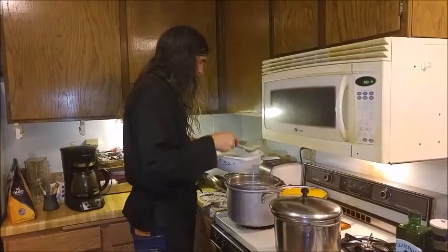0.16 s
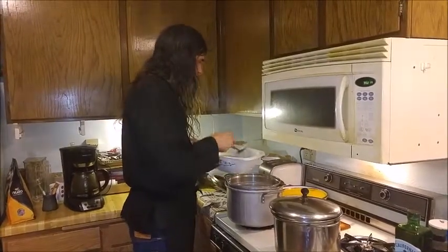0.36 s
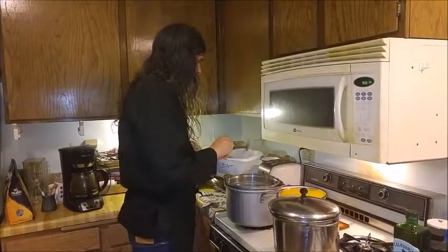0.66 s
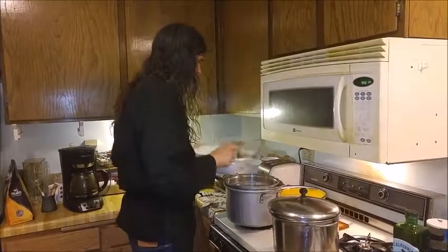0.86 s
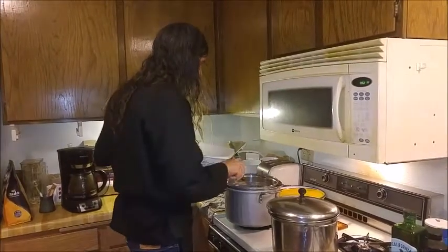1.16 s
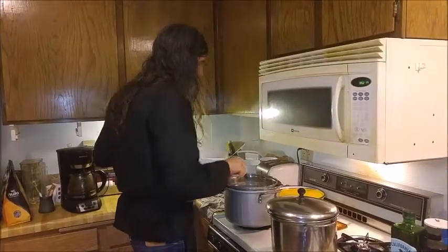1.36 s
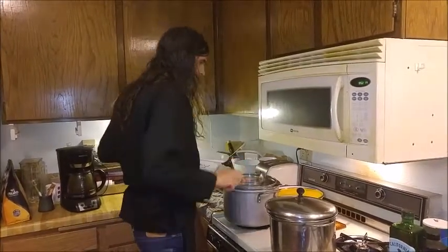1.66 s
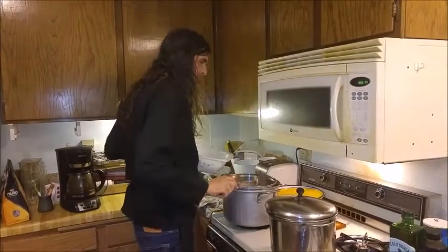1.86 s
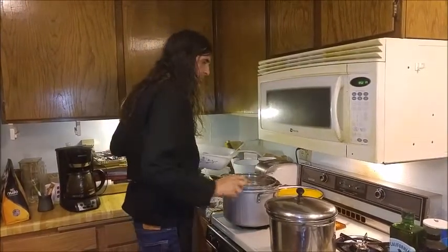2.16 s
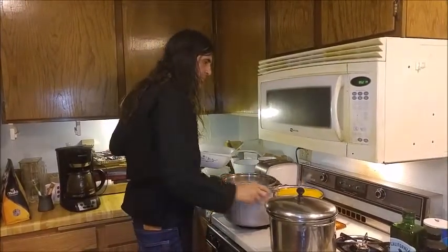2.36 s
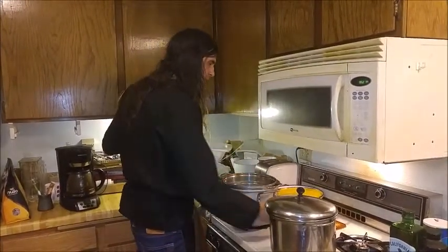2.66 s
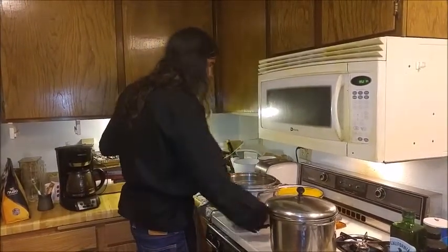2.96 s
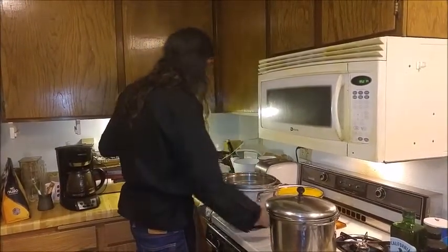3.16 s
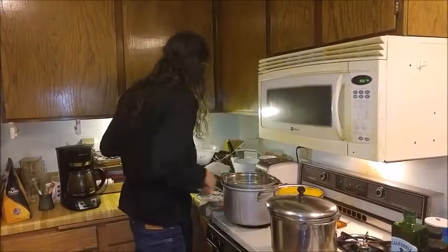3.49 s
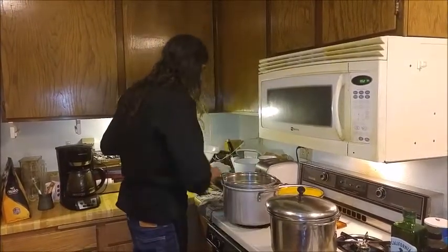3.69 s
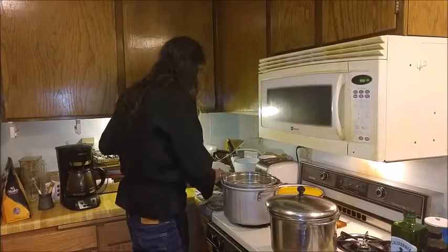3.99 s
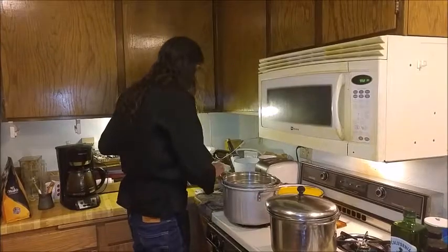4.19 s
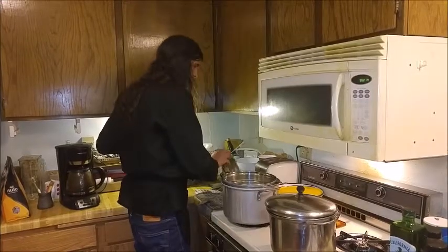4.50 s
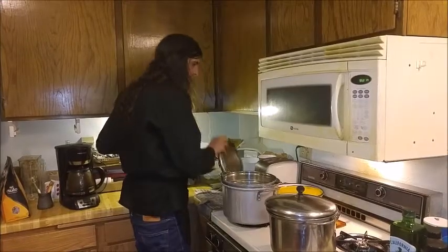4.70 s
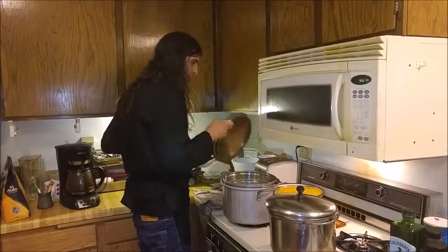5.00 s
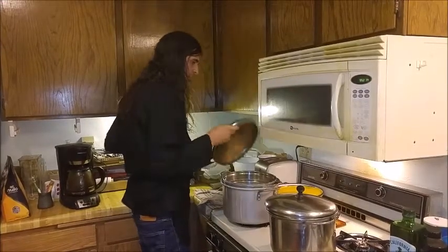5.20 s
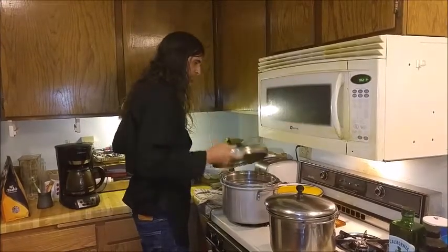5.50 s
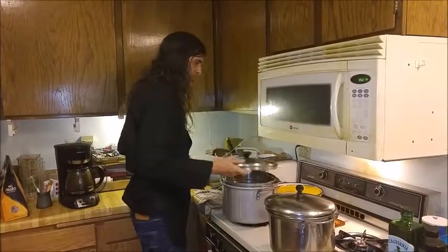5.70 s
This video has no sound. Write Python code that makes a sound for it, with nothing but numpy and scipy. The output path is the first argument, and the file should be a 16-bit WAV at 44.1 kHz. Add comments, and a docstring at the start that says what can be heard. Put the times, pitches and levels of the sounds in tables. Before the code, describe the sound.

In a small home kitchen, a few steps from the microphones, faint touches precede two loud, bright spoon raps on a pot rim. The spoon clatters onto the stove top and a pan knocks. A sleeve brushes softly, then a steel lid is nudged, thuds, is lifted, bumps with a rattle and lands on the pot. Low room hush, a faint high whine and tiny dry ticks run beneath.

```python
"""A cook at a stove in a small kitchen, a few steps from the microphones, over a quiet hush and a faint whine.
A light tap and touches come first; a spoon raps twice on a pot rim as the pot rocks, then clatters
down on the stove top. A pan knocks, cookware shifts, a sleeve brushes the counter amid small touches; a steel
lid is nudged, thuds, is lifted, grazes, bumps with a rattle and is set down on the pot. Dry ticks dot the scene.
Knocks are noise cracks plus ringing modes, thrown back by the cabinets; friction and air are shaped noise."""
import sys
import numpy as np
from scipy import signal
from scipy.fft import rfft, irfft
from scipy.io import wavfile
from scipy.ndimage import uniform_filter1d

SR = 44100
rng = np.random.default_rng(int(sys.argv[2]) if len(sys.argv) > 2 else 0)


def digitize_waveform(pressure):
    """Quantize a signal to 16-bit integers and store it at the path in sys.argv[1].

    Rows of a 2-D input are taken as channels; values are limited to [-1, 1].
    """
    field = np.atleast_2d(pressure).T
    bounded = np.clip(field, -1, 1)
    quanta = np.round(bounded * 32767).astype(np.int16)
    wavfile.write(sys.argv[1], SR, quanta)


N = 257828  # scene length, samples
SIZE = 32768  # length of one knock with its room tail, samples


def amp(db):
    """Decibels to gain."""
    return 10 ** (np.asarray(db) / 20)


def evened(x):
    """Scales to rms 1."""
    return x / np.sqrt(np.mean(x ** 2) + 1e-20)


def read(points, hz):
    """Reads a table on a log-frequency axis."""
    f, value = np.transpose(points)
    return np.interp(np.log(hz + 1), np.log(f + 1), value)


def add(mix, start_s, sound):
    """Mixes a stereo sound in at its start time, cut where the scene ends."""
    part = mix[:, round(start_s * SR):][:, :sound.shape[1]]
    part += sound[:, :part.shape[1]]


def two_ports(z, hz):
    """Two unrelated spectra become a diffuse field at two spaced microphones: bass alike, treble apart."""
    same = .95 / (1 + (hz / 830) ** 3)
    mid = z[0] * np.sqrt(1 + same)
    side = z[1] * np.sqrt(1 - same)
    return np.array([mid + side, mid - side])


def noise(colour):
    """Diffuse stereo noise of this colour, rms 1."""
    hz = np.fft.rfftfreq(N, 1 / SR)
    diffuse = two_ports(rfft(rng.standard_normal((2, N))), hz)
    return evened(irfft(diffuse * amp(read(colour, hz)), N))


def wander(rate_hz):
    """Slow chance up to this rate, rms 1."""
    slow = np.fft.rfftfreq(N, 1 / SR) < rate_hz
    return evened(irfft(rfft(rng.standard_normal(N)) * slow, N))


def causal(db):
    """Spectrum of the filter with this gain that rings only after the blow."""
    cepstrum = irfft(db * np.log(10) / 20)
    one_sided = np.r_[1, np.full(SIZE // 2 - 1, 2), 1, np.zeros(SIZE // 2 - 1)]
    return np.exp(rfft(cepstrum * one_sided))


# standing waves and gaps between cabinets, counter and floor: centre_hz, width_hz, gain_db
STANDING_WAVES = [(50.4, 6, 4.5), (183, 5, 9), (194, 10, -6.5), (264, 27, 4.5), (310, 8.8, -4),
                  (512.4, 37, -10)]


def standing_db(hz):
    """Peaks and gaps that the kitchen gives to every knock's low end."""
    return sum(db * np.exp(-.5 * ((hz - f) / width) ** 2) for f, width, db in STANDING_WAVES)


# how long the kitchen rings in each band: band_hz, t60_s
KITCHEN_DECAY = [(55, 0.85), (160, 0.48), (420, 0.34), (1500, 0.305), (7000, 0.315), (14000, 0.22)]


def kitchen(count):
    """Spectra of paths to the microphones: weak direct sound, swelling cabinet echoes, a tail dying by band."""
    early, early_s = .76, .026  # extra strength of the early echoes (share), and how long it lasts
    build_s, direct = .0023, 1.3  # time for echoes to build up; direct sound (gain)
    t, hz = np.arange(SIZE) / SR, np.fft.rfftfreq(SIZE, 1 / SR)
    centres, t60s = np.transpose(KITCHEN_DECAY)
    bands = [read(np.c_[centres, one], hz) for one in np.eye(len(centres))]
    early_boost = 1 + early * np.exp(-(t / early_s) ** 2)
    decays = np.exp(-np.log(1000) * t / t60s[:, None]) * early_boost
    standing, paths = standing_db(hz), []
    for _ in range(count):
        taps = rng.standard_normal((2, SIZE)) * (1 - np.exp(-t / build_s))
        taps[0, 8] += direct
        z = rfft(taps)
        z = rfft(sum(irfft(z * band) * decay for band, decay in zip(bands, decays)))
        # echoes carry equal power in every band; colour comes from the object and the standing waves
        power = uniform_filter1d(abs(z) ** 2, size=45)
        level = causal(standing - 10 * np.log10(power + 1e-12))
        paths.append(two_ports(z * level, hz))
    return paths


def overtones_db(hz):
    """Sheet metal has countless close overtones: a random comb of narrow peaks in the treble."""
    depth_db, from_hz = 5.4, 1100
    comb = uniform_filter1d(rng.standard_normal(len(hz)), size=40)
    comb = uniform_filter1d(comb, size=40)
    return depth_db * np.tanh(evened(comb)) * hz ** 2 / (hz ** 2 + from_hz ** 2)


def ringing(modes, swell_s):
    """Each mode swells in, decays and beats against its own echoes."""
    flutter = .2  # waver, rms share of a mode's amplitude
    t = np.arange(SIZE) / SR
    mode_hz, _, t60 = np.transpose(modes)
    waves = np.exp(np.outer(2j * np.pi * mode_hz - np.log(1000) / t60, t))
    waves = waves * (1 - np.exp(-t / swell_s))
    waver = signal.resample(rng.standard_normal((len(modes), 32)), SIZE, axis=1)
    return waves * (1 + flutter * waver)


def blows(rows, colour, modes, ring_db, damp_db_per_s=0, swell_s=.0099):
    """Each contact is a coloured crack scattered by the kitchen, plus object modes; a hand damps both."""
    bass_hz, treble_hz = 480, 3000  # where the bass and treble of the touch take hold
    t, hz, out = np.arange(SIZE) / SR, np.fft.rfftfreq(SIZE, 1 / SR), np.zeros((2, N))
    low_cut_db = 10 * np.log10(1 / (1 + (46 / (hz + 1)) ** 14) + 1e-4)
    fade = np.clip(8 * (1 - t / t[-1]) - .5, 0, 1)
    body = causal(read(colour, hz) + low_cut_db + overtones_db(hz))
    mode_hz, mode_db, _ = np.transpose(modes)
    waves = ringing(modes, swell_s)
    for (start_s, db, bass_db, treble_db), path in zip(rows, kitchen(len(rows))):
        crack = evened(irfft(body * path))
        phases = two_ports(np.exp(2j * np.pi * rng.random((2, len(modes)))), mode_hz)
        ring = evened(((phases * amp(mode_db)) @ waves).real)
        # heavy contacts add bass, hard ones treble
        bass = bass_db / (1 + (hz / bass_hz) ** 4)
        treble = treble_db * (1 - 1 / (1 + (hz / treble_hz) ** 2))
        sound = irfft(rfft(crack + amp(ring_db) * ring) * causal(bass + treble))
        sound = sound * fade * amp(-damp_db_per_s * t)
        attack = np.sqrt(np.mean(sound[:, :SIZE // 32] ** 2))  # level is set by the first moments
        add(out, start_s, sound / attack * amp(db))
    return out


# every knock: kind, start_s, landing_db, edge_db (against landing), edge_to_landing_s, bass_db, treble_db
KNOCK_EVENTS = [("tap", .541, -54, 1, .012, -4, -2), ("rap", 1.807, -14, 1.5, .008, -1, 1),
                ("rock", 1.858, -37, -4, .01, 0, 0), ("rap", 2.077, -18, 4.5, .007, -.5, .5),
                ("rock", 2.1, -38.5, -3, .012, 0, 0), ("clatter", 2.882, -17.3, -2.5, .0055, -2, 1.5),
                ("clatter", 2.9, -23, -1, .008, 2, -3), ("clatter", 2.944, -26, 5, .012, -4, 3.5),
                ("knock", 3.218, -20.8, -1, .014, -5.5, -1), ("nudge", 3.664, -57, -1, .008, 8, -4),
                ("nudge", 4.093, -34.5, -7, .009, 6, .5), ("thud", 4.369, -31, -7, .015, 2, 1.5),
                ("lift", 4.744, -33, -3, .012, 0, 3), ("lift", 4.779, -39.5, -3, .012, 0, 0),
                ("graze", 5.133, -32, -2, .008, -1, 1.5), ("rattle", 5.162, -38, 3, .005, -6, 10),
                ("bump", 5.164, -18.3, -8, .008, .5, -2.5), ("rattle", 5.274, -41.5, -1, .009, -3, -5),
                ("set down", 5.734, -18.3, -10, .0035, -2, 4), ("set down", 5.843, -21, 1.5, .004, 15, 11)]


def contacts(kind):
    """A knock is three contacts: the edge touches, the weight lands, the object rocks back."""
    edge_bass_db, edge_treble_db = -3.5, -1.5  # an edge sounds thinner than the landing
    rock_gaps, rock_db = 2.1, -12  # rocking back: delay after landing (in gaps), level against it
    rows = []  # start_s, level_db, bass_db, treble_db
    for name, start_s, db, edge_db, gap_s, bass_db, treble_db in KNOCK_EVENTS:
        if name == kind:
            landing_s = start_s + gap_s
            rows += [(start_s, db + edge_db, bass_db + edge_bass_db, treble_db + edge_treble_db),
                     (landing_s, db, bass_db, treble_db),
                     (landing_s + rock_gaps * gap_s, db + rock_db, bass_db, treble_db)]
    return rows


# colour of the kitchen hush: pitch_hz, level_db (per Hz)
AIR_COLOUR = [(25, -31.5), (60, -13), (90, -28), (136, -4), (160, -21), (184, 1.5), (215, -16), (280, -10),
              (440, -12), (500, -23), (650, -8.5), (1300, -20.5), (2050, -23.5), (4500, -29.5), (7100, -24),
              (7850, -26), (8400, -15.5), (9400, -26), (15500, -32.5)]


def air():
    """The quiet hush of the kitchen is diffuse noise, wavering slightly and slowly."""
    level_db, waver_db = -64, -1.4
    return amp(level_db + waver_db * wander(6)) * noise(AIR_COLOUR)


def whistle():
    """A faint, fuzzy high whine that comes and goes: a narrow noise band with a loose throb."""
    level_db, centre_hz, width_hz, throb_hz = -75, 6430, 220, 6.8
    hz = np.fft.rfftfreq(N, 1 / SR)
    tone_band = np.exp(-.5 * ((hz - centre_hz) / width_hz) ** 2)
    tone = irfft(rfft(rng.standard_normal((2, N))) * tone_band, N)
    throb_band = np.exp(-.5 * (hz - throb_hz) ** 2)
    throb = evened(irfft(rfft(rng.standard_normal(N)) * throb_band, N))
    return amp(level_db) * evened(tone * (1 + np.tanh(2 * throb)))


# tiny dry ticks by the microphones: start_s, level_db
DRY_TICKS = [(.291, -46.5), (1.571, -45.5), (2.851, -49), (4.131, -44.5), (5.412, -47.5)]


def ticks():
    """Faint, very short ticks of band noise with no room around them."""
    centre_hz, width_hz, peak_s = 8200, 1900, .0006  # peak_s: time from start to peak
    t, out = np.arange(512) / SR, np.zeros((2, N))
    hz = np.fft.rfftfreq(len(t), 1 / SR)
    band = 1 / (1 + ((hz - centre_hz) / width_hz) ** 2) ** 2
    envelope = t / peak_s * np.exp(1 - t / peak_s)
    for start_s, db in DRY_TICKS:
        fizz = irfft(rfft(rng.standard_normal((2, len(t)))) * band)
        add(out, start_s, amp(db) * evened(fizz) * envelope)
    return out


# light touches of the spoon and, later, other small things: start_s, level_db, bass_db, treble_db
LIGHT_TOUCHES = [(1.024, -51.5, 0, 11), (1.235, -60, 8, 5), (3.917, -51.5, -12, 4), (4.001, -54, 8, -12)]
# colour of a light touch: pitch_hz, level_db
TOUCH_TONE = [(59, -50), (100, -20), (321, -3), (500, -9), (700, 0), (1400, -15), (4500, -22), (8550, -9),
              (15800, -25)]
# ringing modes of the spoon, heard in touches and raps: pitch_hz, level_db, t60_s
SPOON_MODES = [(1090, -10, .24), (1365, -13, .27), (1457, 0, .22), (1497, -8, .33), (1548, -3, .22),
               (1610, -2, .2), (1682, -9, .32), (1732, -13, .32), (2290, -12, .24), (4296, -11, .29),
               (4538, -15, .28), (7763, -11, .22), (8086, -9, .2), (8325, -7, .28), (8372, -4, .29),
               (8557, -6, .26), (8770, -4, .25)]


def light_touches():
    """A tap and light touches of the spoon and, later, other small things: weak, damped ringing."""
    rows = LIGHT_TOUCHES + contacts("tap")
    return blows(rows, TOUCH_TONE, SPOON_MODES, ring_db=-22, damp_db_per_s=30)


# colour of spoon on pot rim: pitch_hz, level_db
RAP_TONE = [(45, -31), (280, -19), (950, -20), (1130, -11), (1260, -18), (1460, -2), (1640, -4.5),
            (1830, -13), (2300, -10.5), (3200, -22), (4500, -14), (7500, -12), (8600, -2.5), (9800, -16),
            (15500, -36)]


def spoon_raps():
    """Two hard raps on the pot rim let the spoon ring freely."""
    return blows(contacts("rap"), RAP_TONE, SPOON_MODES, ring_db=-3, swell_s=.005)


# dull colour of the pot rocking: pitch_hz, level_db
ROCKING_TONE = [(50, -19), (100, -25), (330, 1), (1200, -24), (4000, -45)]
# ringing modes of the stove top, also heard in the clatter: pitch_hz, level_db, t60_s
STOVE_MODES = [(291, 0, .3), (409, 0, .25), (630, -.5, .26), (958, -6, .26), (1092, -8, .26),
               (1665, -8, .22), (2589, -12, .21)]


def pot_rocking():
    """The rapped pot rocks with dull knocks and a little stove-top ring."""
    return blows(contacts("rock"), ROCKING_TONE, STOVE_MODES, ring_db=-12)


# colour of the spoon's clatter, also heard in the lid's rattle: pitch_hz, level_db
CLATTER_TONE = [(40, -39), (242, -11.5), (289, -8.5), (410, -9.5), (526, -6), (627, -6), (1060, -16),
                (1170, -21), (1620, -12), (2700, -18), (3300, -25), (8460, -24), (15800, -41)]


def spoon_put_down():
    """The spoon clatters down and the stove top rings undamped."""
    return blows(contacts("clatter"), CLATTER_TONE, STOVE_MODES, ring_db=-5)


# things shifted softly by hand: start_s, length_s, level_db
SOFT_SLIDES = [(3.145, 0.15, -57), (4.2, 0.3, -61), (4.92, 0.22, -60)]
# colour of cookware sliding and of the lid's thud: pitch_hz, level_db
THUD_TONE = [(60, -35), (180, -10.5), (370, -2.5), (480, -9), (680, 1.5), (850, -5.5), (1600, -24),
             (2100, -13), (3200, -34.5), (8000, -27.5), (15500, -40)]


def slides():
    """Soft, unevenly catching friction of cookware: noise in rounded strokes."""
    catch_db, catch_hz = -1, 40
    t = np.arange(N) / SR
    stroke = sum(amp(db) * np.sin(np.pi * np.clip((t - start_s) / length_s, 0, 1))
                 for start_s, length_s, db in SOFT_SLIDES)
    return stroke * evened(amp(catch_db * wander(catch_hz))) * noise(THUD_TONE)


# colour of the pan's knock: pitch_hz, level_db
KNOCK_TONE = [(40, -8), (60, -12.5), (114, -22), (268, -2), (410, -5), (501, -16.5), (612, -3), (1060, -13),
              (1350, -22), (2080, -7), (2600, -18.5), (3270, -25.5), (4700, -28.5), (8460, -25.5),
              (15800, -58)]
# ringing modes of the pan: pitch_hz, level_db, t60_s
PAN_MODES = [(291, 1, .19), (619, -3, .28), (694, -1.5, .26), (1045, -9, .2), (1630, -9, .22),
             (2046, -3, .14), (2030, -15, .42), (2075, -15, .36), (2130, -8, .13)]


def pan_knock():
    """A full, lightly damped knock sets the pan's modes ringing."""
    return blows(contacts("knock"), KNOCK_TONE, PAN_MODES, ring_db=-3.5, damp_db_per_s=10)


# colour of the lid nudged, and of its later graze: pitch_hz, level_db
NUDGE_TONE = [(60, -41), (520, -22), (715, 4.5), (850, -14), (1030, -11), (1350, -36), (2300, -15),
              (3000, -24), (3800, -36), (8500, -37), (15500, -56)]
# ringing modes of the lid, also heard as it is lifted: pitch_hz, level_db, t60_s
LID_MODES = [(690, 0, .1), (765, -7, .12), (1916, -13, .2), (2365, -11, .15), (2439, -11, .22),
             (2676, -14, .28), (2945, -16, .2)]


def lid_nudged():
    """The lid is nudged; strong damping cuts its ring short."""
    return blows(contacts("nudge"), NUDGE_TONE, LID_MODES, ring_db=-5, damp_db_per_s=80, swell_s=.004)


# a sleeve brushes along the counter: time_s, level_db
SLEEVE_STROKE = [(3.76, -78), (3.87, -62), (3.98, -56), (4.05, -60), (4.16, -82)]
# colour of the cloth: pitch_hz, level_db (per Hz)
CLOTH_COLOUR = [(150, -14), (300, 0), (680, 0), (1300, -13), (3000, -11), (4900, 1), (7000, -7),
                (15500, -16)]


def rustle():
    """Cloth hisses as it slides, swelling and fading, its folds catching unevenly."""
    grain_db, grain_hz = 1, 90
    time_s, db = np.transpose(SLEEVE_STROKE)
    stroke = amp(np.interp(np.arange(N) / SR, time_s, db, left=-np.inf, right=-np.inf))
    return stroke * evened(amp(grain_db * wander(grain_hz))) * noise(CLOTH_COLOUR)


# ringing modes of the lid lying on the counter: pitch_hz, level_db, t60_s
COUNTER_LID_MODES = [(372, 0, .17), (570, -3, .15), (636, -4, .14), (700, -1, .15), (1912, -12, .2),
                     (2420, -17, .15), (4080, -22, .17)]


def lid_thud():
    """The lid thuds on the counter, its damped ring above the crack."""
    return blows(contacts("thud"), THUD_TONE, COUNTER_LID_MODES, ring_db=2, damp_db_per_s=40)


# colour of the lid being lifted: pitch_hz, level_db
LIFT_TONE = [(35, -59.5), (60, -23), (270, -8), (426, -5), (501, -19), (680, -4), (1240, -16), (2450, -7),
             (3000, -11), (3400, -19), (8820, -20), (15800, -37.5)]


def lid_lifted():
    """The lid is picked up with two small knocks, damped by the hand."""
    return blows(contacts("lift"), LIFT_TONE, LID_MODES, ring_db=-4, damp_db_per_s=25)


# ringing modes of the lid in the hand, heard in graze, bump and rattle: pitch_hz, level_db, t60_s
HELD_LID_MODES = [(632, -5, .16), (718, 0, .13), (1000, -14, .12), (2290, -17, .18), (7400, -23, .24)]


def lid_grazed():
    """The held lid grazes something, its ring well damped."""
    return blows(contacts("graze"), NUDGE_TONE, HELD_LID_MODES, ring_db=-6, damp_db_per_s=40)


# colour of the lid's bump: pitch_hz, level_db
BUMP_TONE = [(40, -19), (125, -6), (179, -5), (225, -17), (526, -7), (660, 1), (1330, -24), (1850, -23),
             (2300, -11.5), (3400, -29), (4880, -26), (6110, -32), (7280, -20), (15800, -46)]


def lid_bumped():
    """A solid bump rings the held lid, with quieter rattles around it."""
    bump = blows(contacts("bump"), BUMP_TONE, HELD_LID_MODES, ring_db=-1.5, damp_db_per_s=15, swell_s=.003)
    rattle = blows(contacts("rattle"), CLATTER_TONE, HELD_LID_MODES, ring_db=-14)
    return bump + rattle


# colour of lid on pot: pitch_hz, level_db
SETDOWN_TONE = [(60, -53), (180, -21.5), (310, -15.5), (455, 2), (560, -10), (800, -7), (930, -10),
                (1100, -15), (1750, -18.5), (2150, -7), (2800, -33), (5000, -31.5), (8600, -24.5),
                (15500, -39)]
# ringing modes of the pot: pitch_hz, level_db, t60_s
POT_MODES = [(458, .5, .19), (614, -12, .3), (937, -5, .22), (1427, -14, .23), (2094, -10, .18),
             (2304, -11, .18), (8565, -26, .4)]


def lid_set_down():
    """The lid lands on the pot, whose modes ring undamped."""
    return blows(contacts("set down"), SETDOWN_TONE, POT_MODES, ring_db=-1.5)


def scene():
    """Spoon, stove top and lid over the hush of the room."""
    room = air() + whistle() + ticks()
    spoon = spoon_raps() + pot_rocking() + spoon_put_down()
    cookware = slides() + pan_knock()
    lid = lid_nudged() + lid_thud() + lid_lifted() + lid_grazed() + lid_bumped() + lid_set_down()
    return room + light_touches() + spoon + cookware + rustle() + lid


def record(dry):
    """The loudest peaks are rounded off; then a low-pass limits the band."""
    edge_hz = 15900
    rounded = dry / (1 + dry ** 6) ** (1 / 6)
    low_pass = signal.firwin(511, edge_hz, window=("kaiser", 9), fs=SR)
    return signal.oaconvolve(rounded, low_pass[None], "same")


dry = scene()
out = record(dry)
digitize_waveform(out)
```